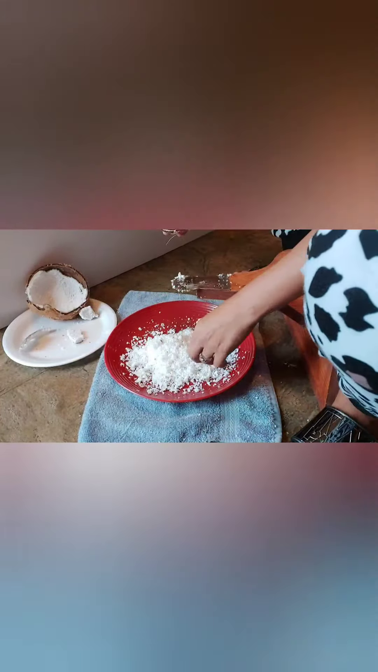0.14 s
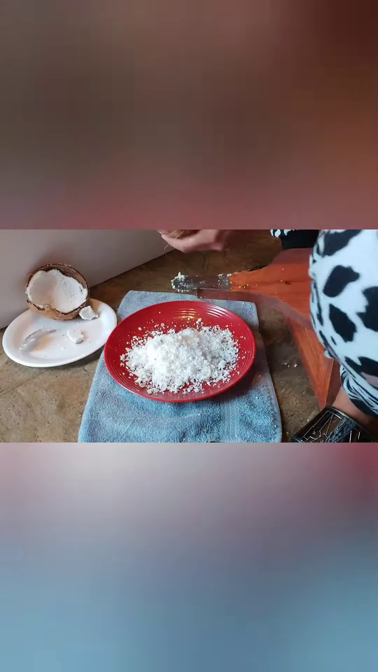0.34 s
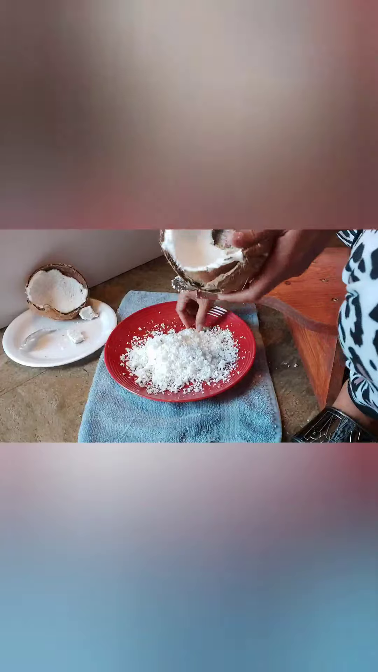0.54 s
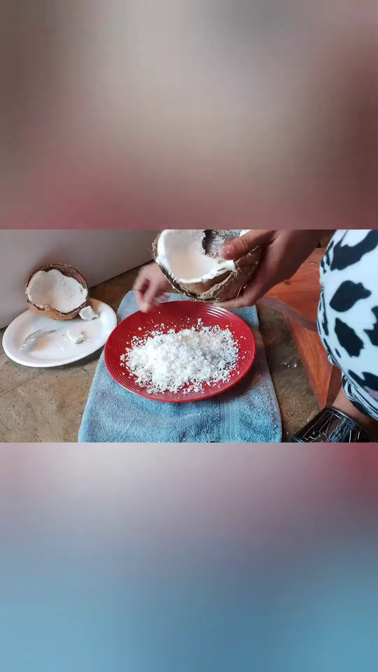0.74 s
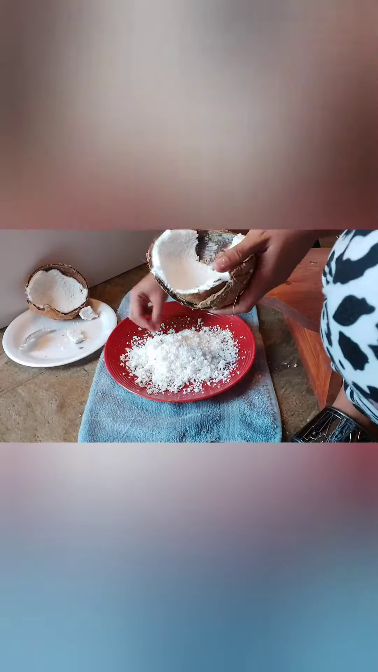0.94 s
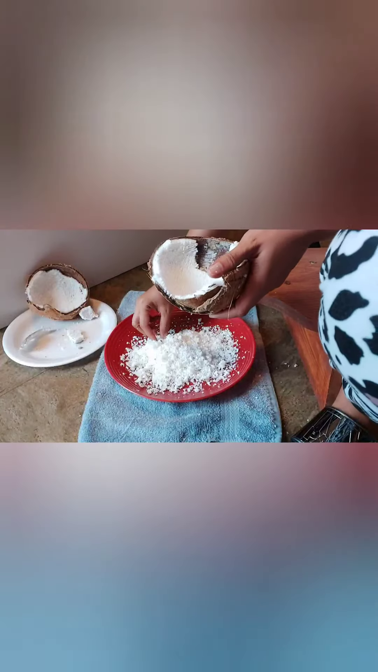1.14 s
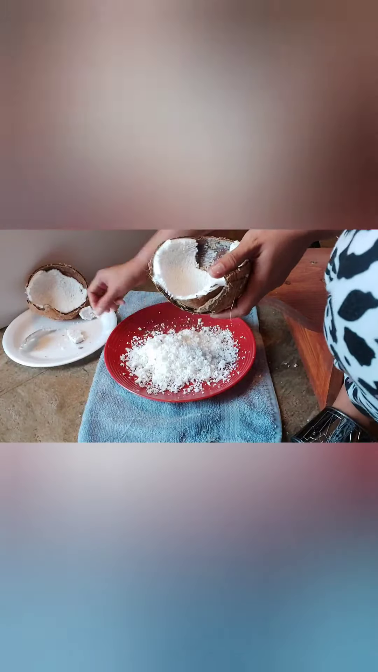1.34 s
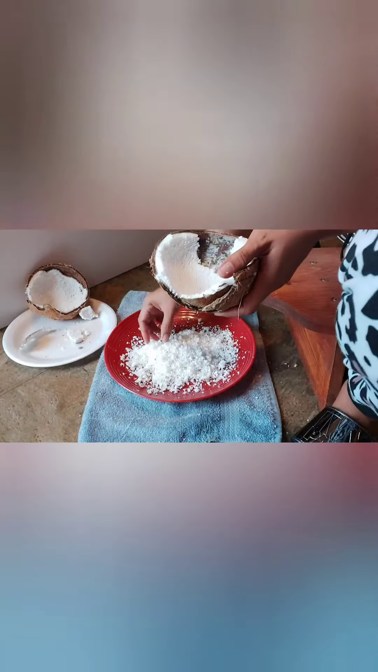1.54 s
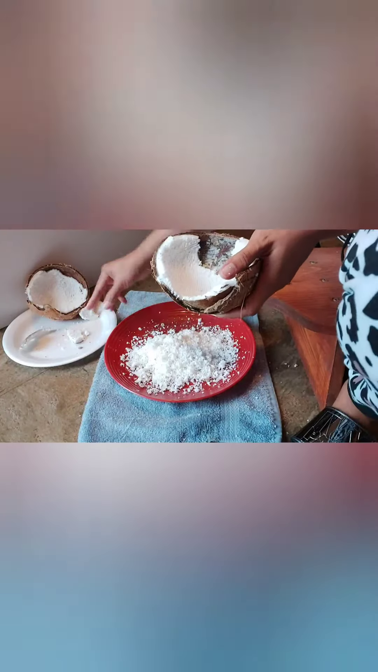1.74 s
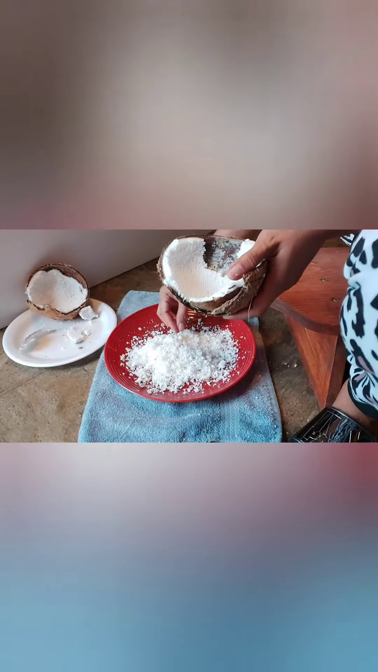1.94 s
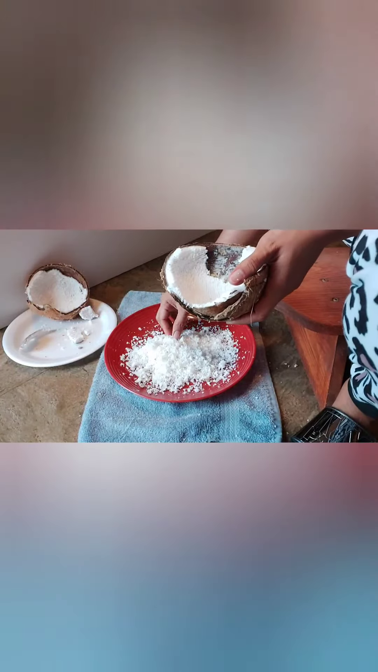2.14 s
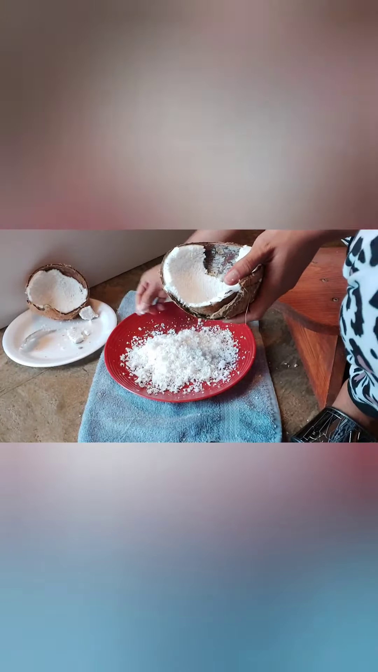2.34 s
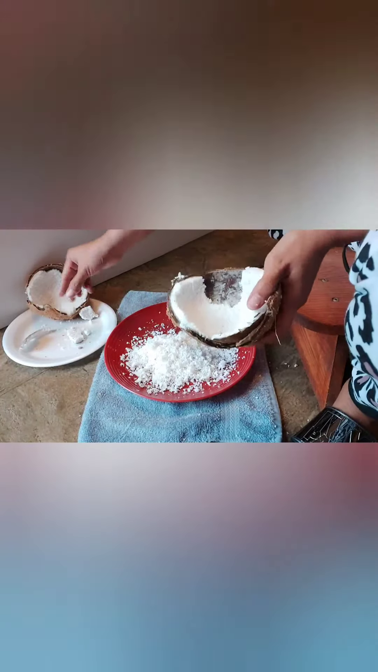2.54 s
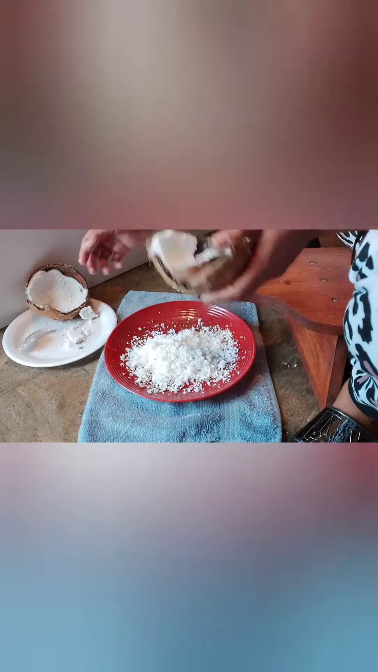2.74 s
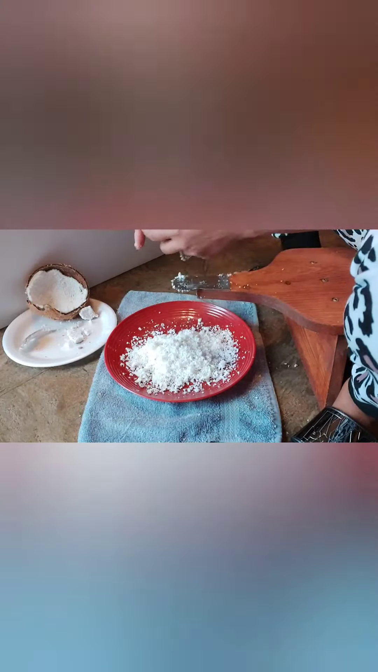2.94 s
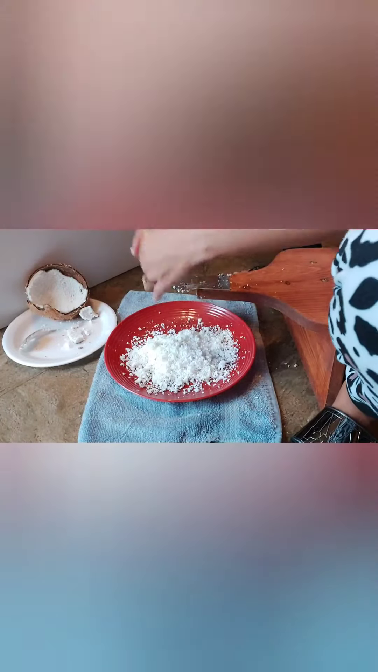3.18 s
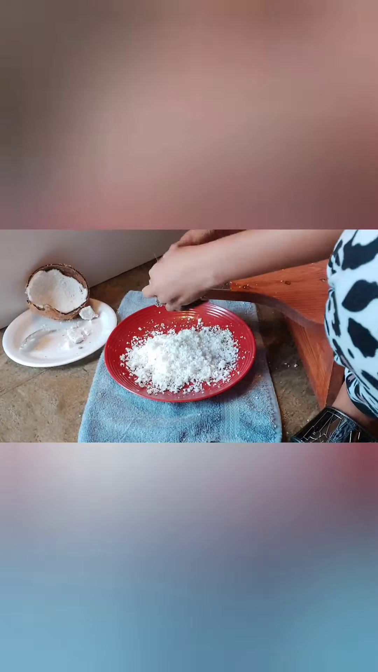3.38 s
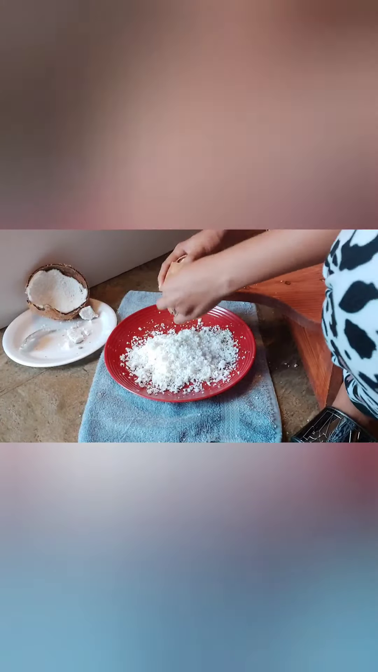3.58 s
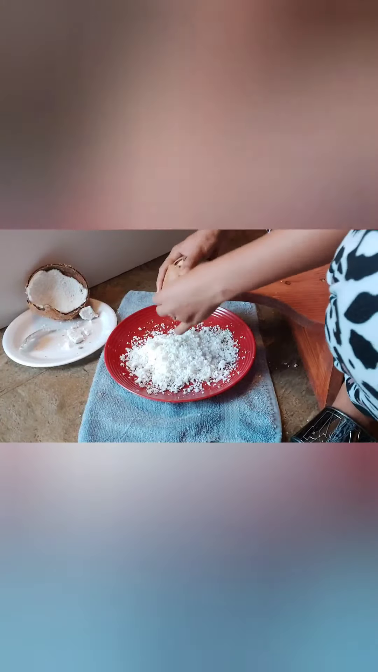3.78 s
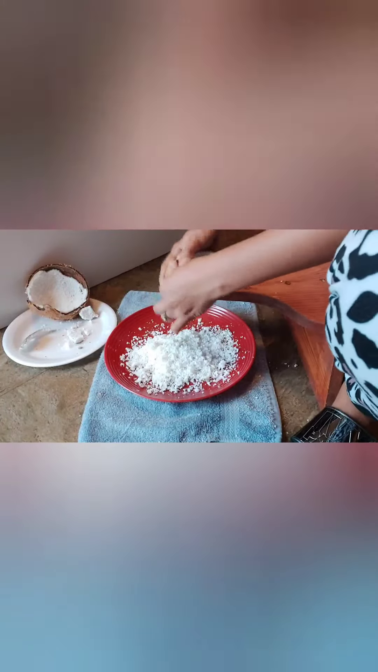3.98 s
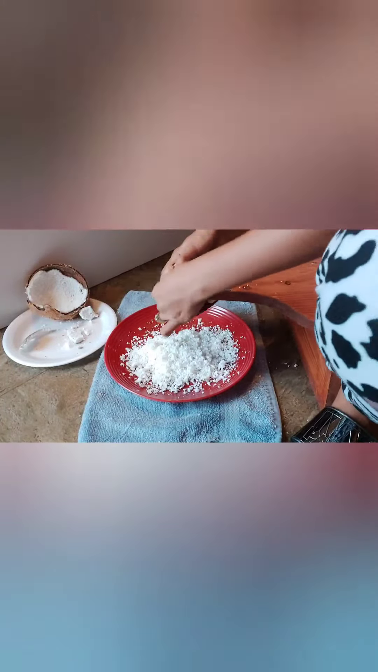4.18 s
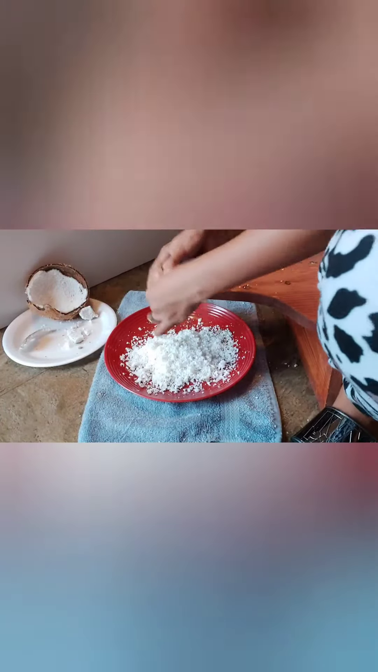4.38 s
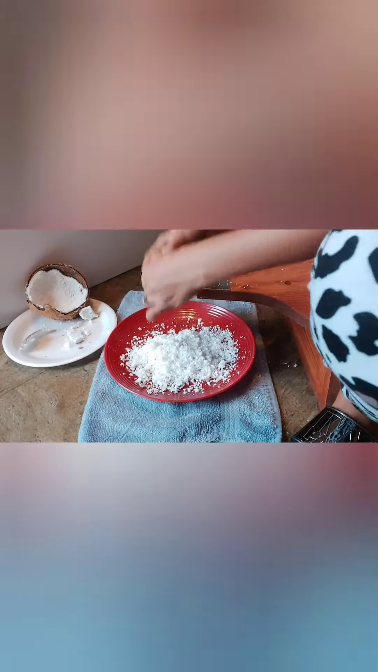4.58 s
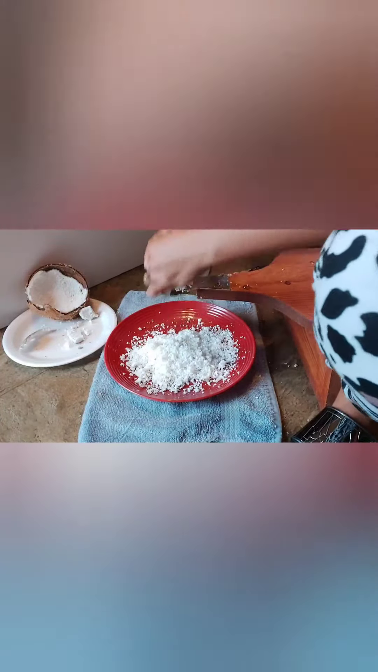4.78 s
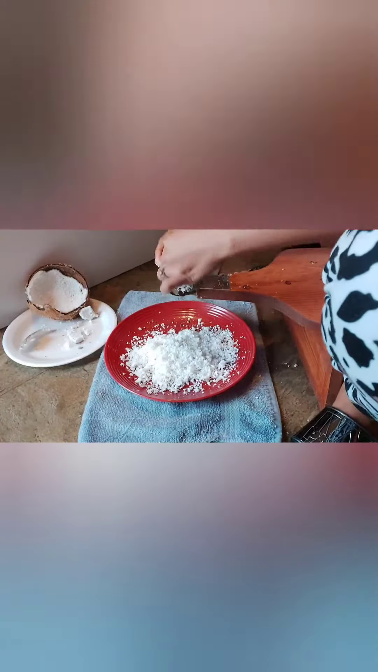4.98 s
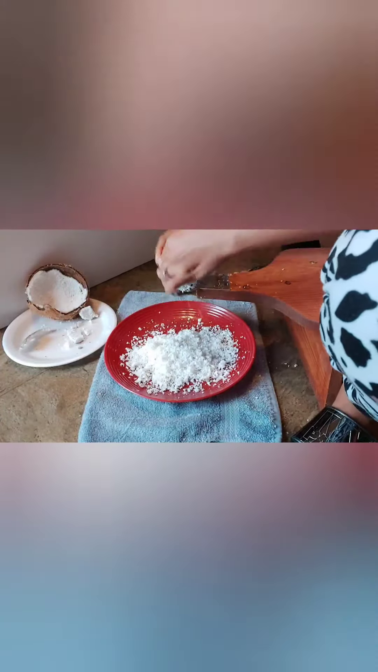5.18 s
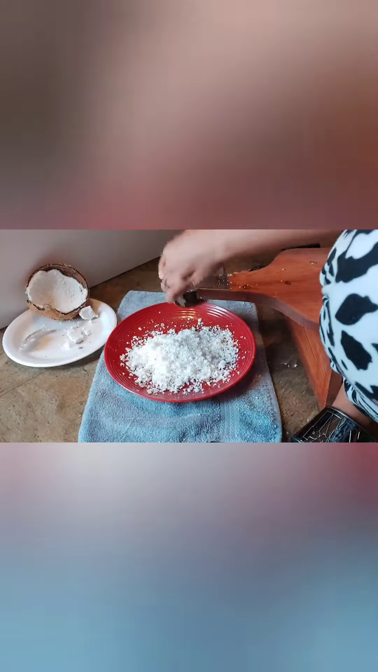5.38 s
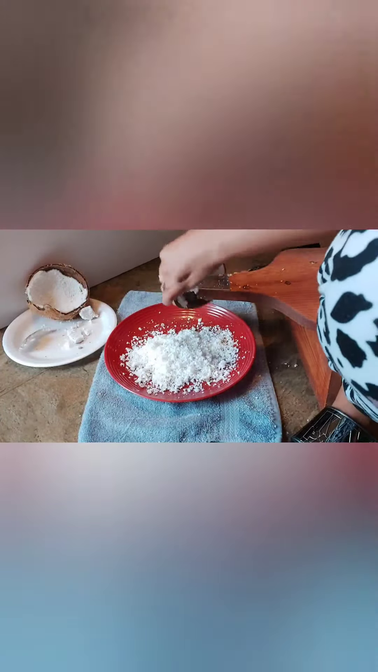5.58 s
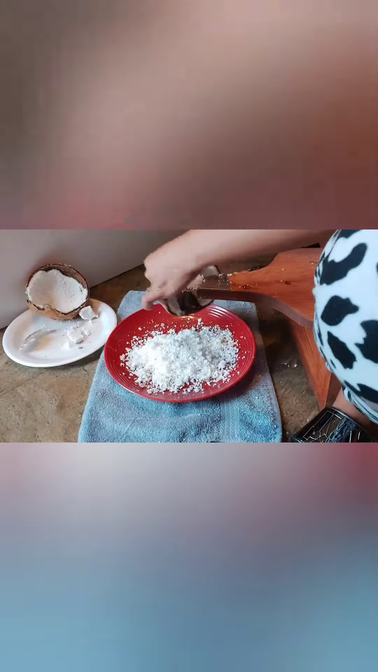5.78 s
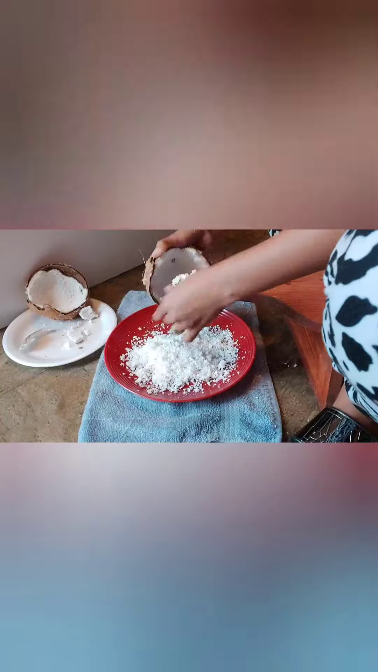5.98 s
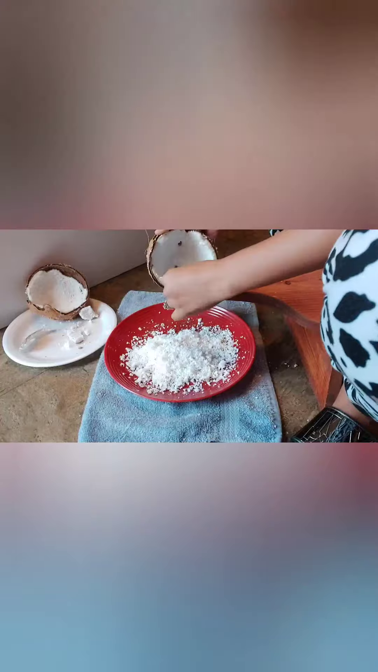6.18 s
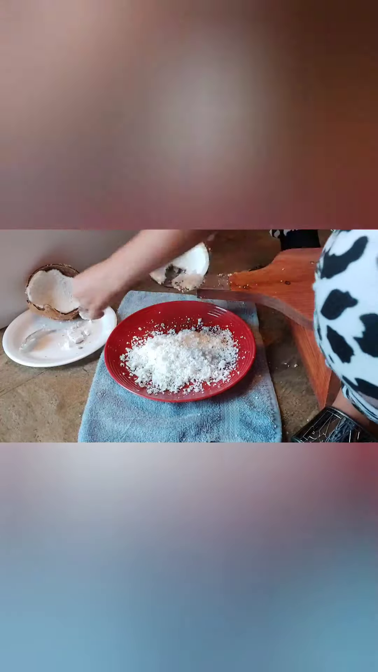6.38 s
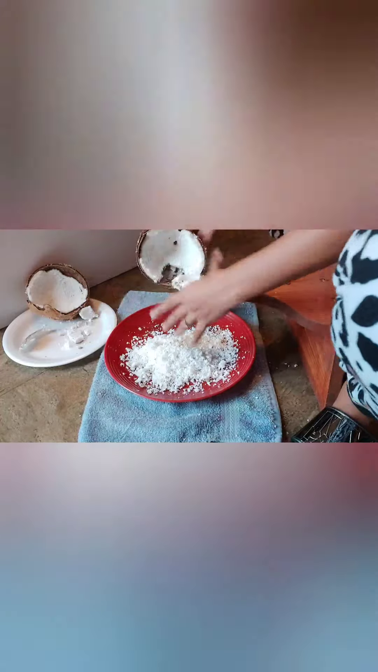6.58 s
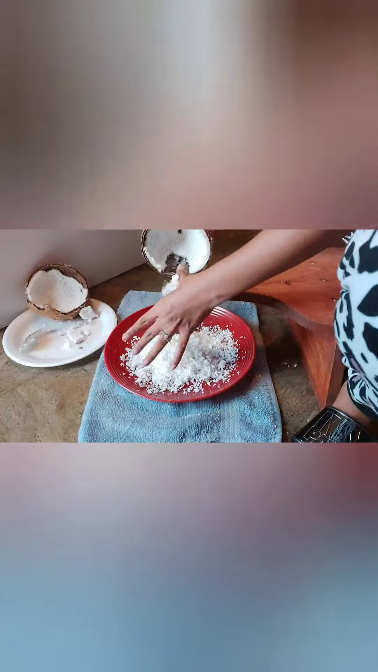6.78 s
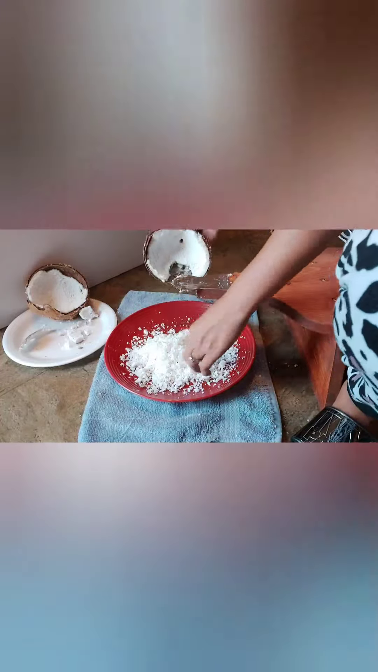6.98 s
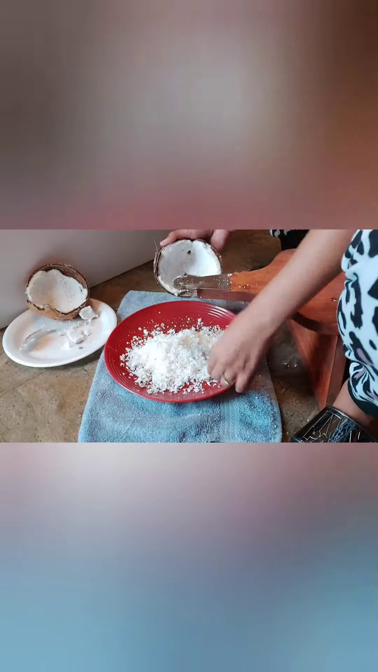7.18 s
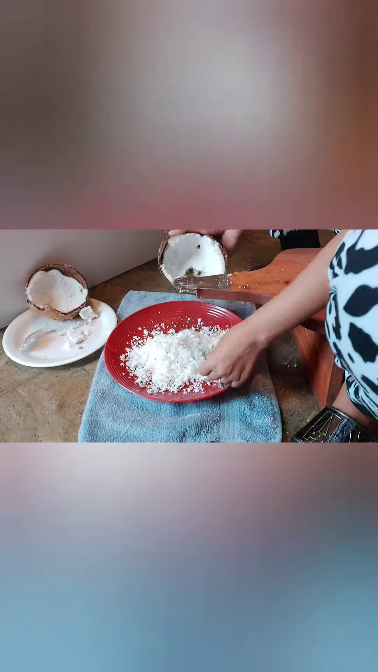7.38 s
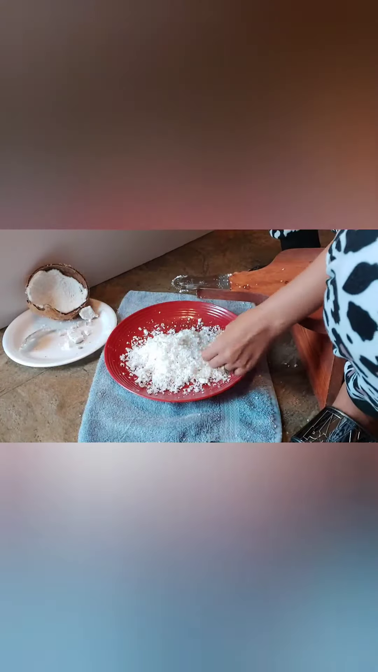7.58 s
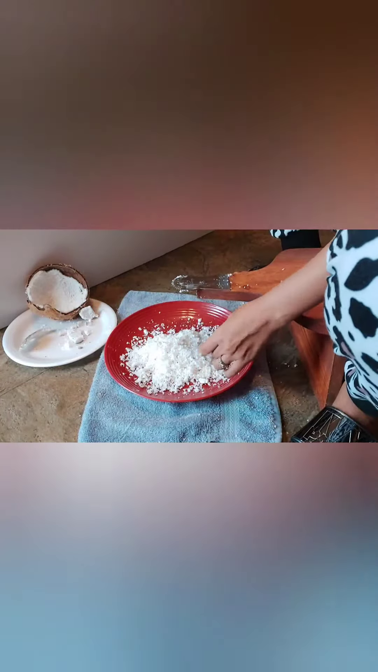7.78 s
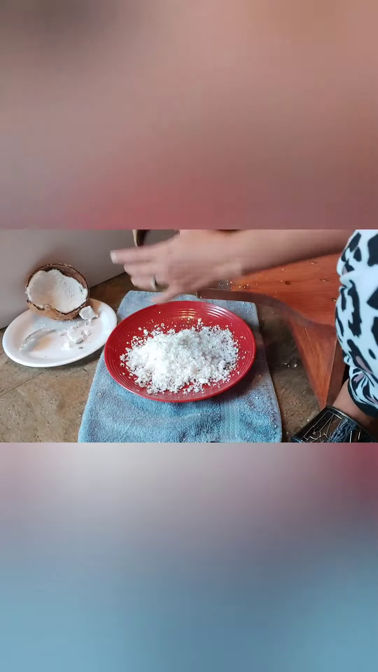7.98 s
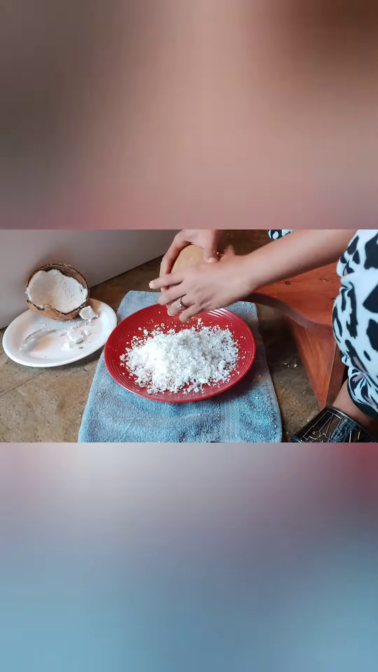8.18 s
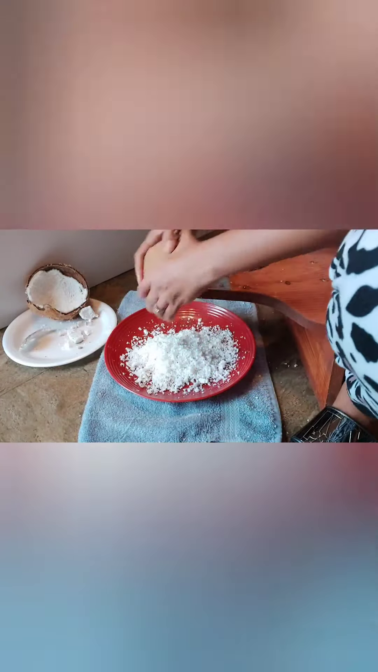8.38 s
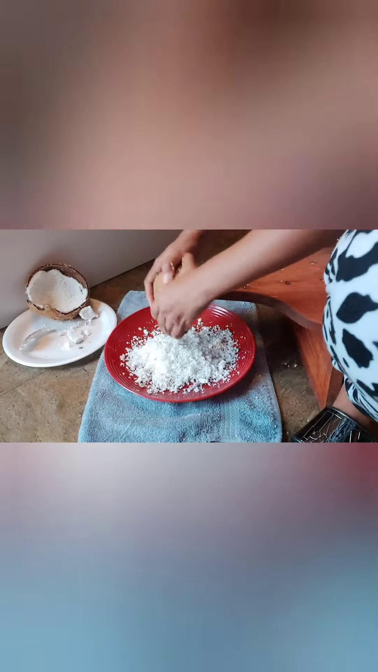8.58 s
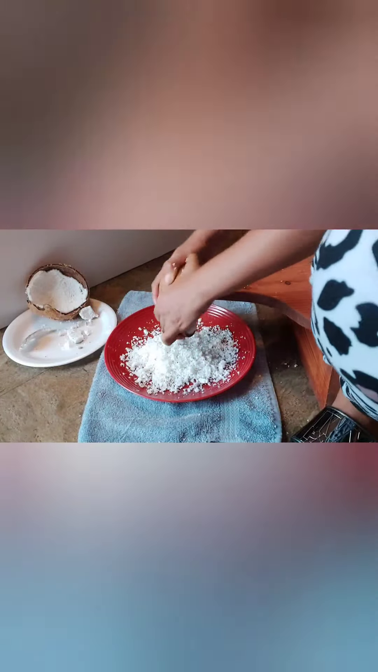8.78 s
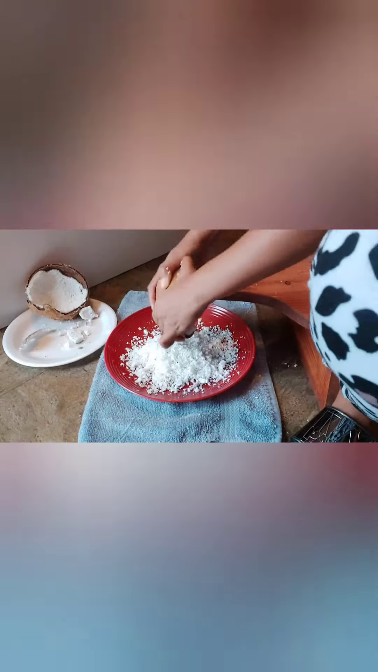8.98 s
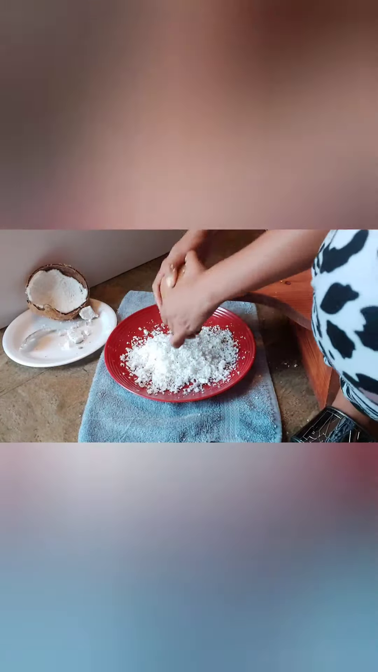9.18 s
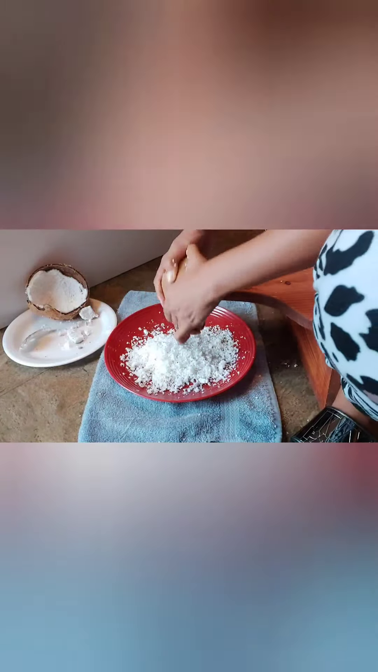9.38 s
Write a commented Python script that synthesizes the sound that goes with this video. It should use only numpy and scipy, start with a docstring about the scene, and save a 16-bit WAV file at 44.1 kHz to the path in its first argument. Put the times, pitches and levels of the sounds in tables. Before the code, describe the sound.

Half a coconut scrapes over a toothed metal blade in two runs of quick rhythmic rasps, wooden bench juddering, after soft rustling and a low machine hum.

```python
"""A machine hums under a rush of air in a small room, and hands rustle in coconut flakes and touch the shell.
Then half a coconut is grated on the toothed blade of a wooden bench, in two runs of quick strokes.
Each stroke is trains of random snaps: torn wet fibres fizz, the blade rasps and the bench judders low.
Hum is wavering tones, air and hiss are coloured noise, touches are ringing noise, thuds are short sines.
Knocks strike the bench and crack the blade; sparse random echoes make the room."""
import sys
import numpy as np
from scipy import signal
from scipy.fft import rfft, irfft, next_fast_len
from scipy.io import wavfile
from scipy.ndimage import uniform_filter1d

SR = 44100
rng = np.random.default_rng(int(sys.argv[2]) if len(sys.argv) > 2 else 0)


def inscribe(sig):
    """Save sig as 16-bit PCM at rate SR to the path in sys.argv[1].

    A 1-D sig is mono; a 2-D sig holds one channel per row.
    Samples are clipped to [-1, 1] before scaling.
    """
    pcm = np.round(np.clip(np.atleast_2d(sig).T, -1, 1) * 32767)
    wavfile.write(sys.argv[1], SR, pcm.astype(np.int16))


N = 415863
TAPS = 8192  # size of the filter designs
HZ = np.fft.rfftfreq(TAPS, 1 / SR)
TIME = np.arange(N) / SR


def amp(db):
    """Turns decibels into a gain."""
    return 10 ** (np.asarray(db) / 20)


def evened(x):
    """Scales a signal to an rms of 1."""
    return x / np.sqrt(np.mean(x ** 2) + 1e-20)


def read(points, hz):
    """Reads a table between its points, on a log-frequency axis."""
    f, value = np.transpose(points)
    return np.interp(np.log(hz + 1), np.log(f), value)


def follow(tables, column):
    """Joins curve tables into one dB curve with a value for every sample."""
    rows = np.concatenate(tables)
    rows = rows[np.argsort(rows[:, 0], kind="stable")]
    return np.interp(TIME, rows[:, 0], rows[:, column])


def during(tables):
    """Gives 1 while any of the tables runs, else 0, with soft edges."""
    on = np.any([(TIME > rows[0][0] - .01) & (TIME < rows[-1][0] + .01) for rows in tables], axis=0)
    return uniform_filter1d(on * 1., size=400)


def add(mix, s, sound):
    """Mixes a sound in, starting at s seconds."""
    part = mix[round(s * SR):][:len(sound)]
    part += sound[:len(part)]


def modes(table):
    """Gain of a set of resonances with steep skirts; each is 6 dB down one width from its centre."""
    power = sum(amp(db) ** 2 / (1 + ((HZ - hz) / width) ** 2) ** 2 for hz, width, db in table)
    return np.sqrt(power)


def ring(x, gain):
    """Filters x with the shape of that gain; the ringing only follows its cause and has energy 1."""
    log_gain = np.log(np.maximum(gain / gain.max(), 1e-5))
    circle = np.concatenate([log_gain, log_gain[-2:0:-1]])
    # minimum phase: the energy comes as early as the gain allows
    response = np.fft.ifft(np.exp(np.conj(signal.hilbert(circle)))).real[:TAPS // 2]
    response = response / np.linalg.norm(response)
    return signal.oaconvolve(np.atleast_2d(x), response[None], axes=1)[:, :x.shape[-1]]


PORT_LAG_S, AIR_LAG_S = 0.00021, 0.00029  # delay of the right port, for near sounds and for air


def ports(pair, likeness, lag_s=PORT_LAG_S):
    """Two microphone ports hear partly the same sound, the right one a little later."""
    size = next_fast_len(N + 1000)
    a, b = rfft(pair, size)
    hz = np.fft.rfftfreq(size, 1 / SR)
    same = np.clip(read(likeness, hz), 0, 1)
    right = same * a + np.sqrt(1 - same ** 2) * b
    right = right * np.exp(-2j * np.pi * hz * lag_s)
    return irfft(np.array([a, right]), size)[:, :N]


# how alike near sounds are at the two ports: f/Hz, likeness (held between 0 and 1)
NEAR_LIKENESS = [(30, 2.7), (400, 0.87), (700, 0.66), (2000, 0.5), (4000, 0.35), (12000, -0.08)]


def slips(per_s, spread_db):
    """Tiny slips make a random train of snaps, a few much larger than the rest."""
    size = amp(spread_db * np.minimum(rng.exponential(1, (2, N)), 4))
    happens = rng.random((2, N)) < per_s / SR
    train = size * rng.choice([-1, 1], (2, N)) * happens
    return ports(evened(train), NEAR_LIKENESS)


# tones of the machine: f/Hz, wavering bandwidth/Hz (held to 0.2-50), level/dB before the port gain
HUM_TONES = [(56, 9.3, -59), (136.9, 2.7, -51), (277.4, 11.3, -52), (292.1, 0.73, -49.5), (533, 13, -67.5),
             (688, 8.7, -72.5)]
# colour of the rushing air: f/Hz, relative level/dB
AIR_COLOUR = [(20, -27), (32, -14.5), (62, 0), (100, -3), (200, -6.5), (260, -1.5), (330, -5), (450, -7.5),
              (540, -14.5), (590, -18), (720, -15.5), (1000, -22), (1600, -27), (2100, -37.5), (2900, -42),
              (3300, -58), (6000, -76)]
# how alike the air is at the two ports: f/Hz, likeness (0 to 1)
AIR_LIKENESS = [(30, 1), (300, 0.58), (700, 0.78), (2000, 0.068), (5000, .1)]
# colour of the microphone hiss: f/Hz, relative level/dB
HISS_COLOUR = [(2000, -57), (3300, 1), (7500, -2.5), (9000, 3), (12500, 2.5), (14500, 0), (15800, -16)]


def background():
    """A machine's tones waver in loudness and phase, in a rush of air over faint microphone hiss."""
    hum = np.zeros(N)
    knots = np.arange(0, TIME[-1] + 1, 1 / 200)  # the slow drift has 200 points per second
    for hz, width, db in HUM_TONES:
        smooth = signal.butter(1, np.clip(width, .2, 50), fs=200, output="sos")
        # the first half lets the filter settle and is dropped
        drift = signal.sosfilt(smooth, rng.standard_normal((2, 2 * len(knots))))[:, len(knots):]
        swell, sway = (np.interp(TIME, knots, d) for d in evened(drift))
        tone = (1 + 0.23 * swell) * np.cos(2 * np.pi * hz * TIME + 0.69 * sway)
        hum += amp(db) * evened(tone)
    air_noise = ports(rng.standard_normal((2, N)), AIR_LIKENESS, AIR_LAG_S)
    air = ring(air_noise, amp(read(AIR_COLOUR, HZ)))
    hiss = ring(rng.standard_normal((2, N)), amp(read(HISS_COLOUR, HZ)))
    port_gain = amp([[.6], [-.6]])  # left and right, in dB
    return (hum + amp(-49.0) * air) * port_gain + amp(-77.0) * hiss


# hands in the flakes and on the husk, one curve per spell: t/s, level/dB before a small trim
RUSTLES = [
    [(0.05, -95), (0.202, -71.5), (0.47, -69), (0.6, -85)],
    [(2.7, -82), (2.908, -67), (3.014, -80), (3.092, -68.5), (3.5, -77.5)],
    [(7.2, -75.5), (7.734, -80.5), (7.756, -68), (7.84, -87), (7.946, -68.5), (8.18, -72)],
]
# colour of the rustling flakes: f/Hz, relative level/dB
FLAKE_COLOUR = [(1000, -36), (3500, -8.5), (7000, -7.5), (10000, -3), (13000, -5), (15800, -10)]
# light touches of fingers, shell and blade:
# t/s, level/dB, f/Hz, width/Hz, rub time scale/s, treble against the main resonance/dB
TOUCHES = [(0.887, -59, 3260, 1900, 0.014, -18), (1.393, -68, 4500, 2500, .0089, 5),
           (1.749, -49.5, 1340, 450, 0.0042, -28), (1.77, -60, 1500, 700, .0071, -17),
           (2.588, -55.5, 8000, 1400, .0026, -10), (3.234, -63, 2220, 600, .016, -18),
           (3.301, -57.5, 2110, 700, .01, -22), (6.062, -63, 1950, 350, 0.021, -20),
           (6.436, -51.5, 2120, 1100, .011, -11.5), (6.512, -48.5, 1980, 330, 0.015, -26)]


def handling():
    """Loose flakes rustle; each touch is a sharp tick in a short rub, with one resonance and some treble."""
    out, lead = np.zeros((2, N)), SR // 20
    t = np.arange(-lead, SR // 6) / SR
    for s, db, hz, width, length, treble_db in TOUCHES:
        # swells before the touch and fades more slowly after it
        rub = np.exp(np.minimum(t / (0.65 * length), -t / (1.43 * length)))
        tick = amp(-8.0) * np.exp(-abs(t) / 0.00057)
        colour = modes([(hz, width, 0), (6500, 5000, treble_db)])
        noise = rng.standard_normal((2, len(t))) * (rub + tick)
        for side, sound in zip(out, ring(noise, colour)):
            add(side, s - lead / SR, amp(db) * sound)
    rustle_level = during(RUSTLES) * amp(follow(RUSTLES, 1) - 1.1)
    rustle = ring(slips(900, 0.84) * rustle_level, amp(read(FLAKE_COLOUR, HZ)))
    return ports(out, NEAR_LIKENESS) + rustle


# weight shifts on the bench: t/s, level/dB before the boost, f/Hz
THUDS = [(3.224, -45, 87.5), (3.287, -42.5, 76.4), (6.584, -42, 132)]


def thuds():
    """Shifting weight bumps the bench: a low sine swells and dies away softly."""
    out, t = np.zeros(N), np.arange(SR // 4) / SR
    u = t / 0.0059  # 1 at the peak of the swell
    for s, db, hz in THUDS:
        bump = u * np.exp(1 - u) * np.sin(2 * np.pi * hz * t)
        add(out, s, amp(db + 10.5) * bump)
    return out


BITE_S, RELEASE_S = 0.0061, 0.01  # the teeth bite in quickly and let go more slowly


def gate(t, start, end):
    """Near 1 while the teeth are in the flesh, with a quick bite and a slower release."""
    bite = (1 + np.tanh((t - start) / BITE_S)) / 2
    release = (1 - np.tanh((t - end) / RELEASE_S)) / 2
    return bite * release


EASE_AT, EASE_WIDTH = 0.45, 0.19  # where and for how long the wrist eases, as shares of the stroke
RUN_UP_DB = -7.5  # sliding before the teeth sink in, against the full force
SLIDE_DB, SLIDE_S = -23, 0.031  # the flesh brushes the teeth around each stroke
SETTLE_DB = -3.5  # the bench shakes less, for the same force, as the stroke goes on
LINGER_DB, LINGER_S = -17.5, .04  # and keeps trembling faintly after it
# one row per stroke of the shell over the teeth: t/s, length/s, force level/dB,
# change of force from start to end/dB, easing midway/dB (below 0 presses harder),
# bench boom over force/dB, bench clatter over force/dB, light run-up/s
STROKES = [(3.548, 0.079, -42.5, -14, 6, 16, 13, 0.016), (3.707, 0.028, -47, 2, 0, 18, 13, 0.018),
           (3.762, 0.084, -41.5, 2.5, 1.5, 7, 8.5, 0.0088), (3.947, 0.091, -40, -8.5, -0.5, 14, 12.5, 0),
           (4.115, 0.082, -38, -5, 9, 9, 13, 0.02), (4.289, 0.073, -37, -4.5, 14.5, 13.5, 11, 0.01),
           (4.454, 0.085, -37, -11.5, 16.5, 15, 14.5, 0.0082), (4.64, 0.073, -39, -6.5, 2, 11, 11, 0),
           (4.801, 0.081, -38.5, 2, 3, 12.5, 12, 0), (4.988, 0.069, -35, -5, 8, 1, 11, 0.0091),
           (5.16, 0.08, -39.5, -2.5, -3.5, 8.5, 10.5, 0.0087), (5.338, 0.07, -34.5, 2.5, 9.5, 7.5, 12.5, 0),
           (5.527, 0.084, -41, -6, -4.5, 13, 13.5, 0.0074), (5.717, 0.012, -28, -5, 0.5, 17, 15, 0.0051),
           (5.873, 0.021, -34, 0, 0, 8.5, 13, 0), (8.25, 0.058, -36, 7, -1.5, 10.5, 13, 0.038),
           (8.406, 0.021, -53, -4, -1, 17, 19, 0.011), (8.487, 0.069, -36, 3, -3.5, 13, 12, 0.027),
           (8.717, 0.063, -39, 0.5, -4, 13, 13.5, 0.057), (8.922, 0.076, -42, -3.5, -4.5, 13.5, 15, 0.029),
           (9.078, 0.021, -49, -5, 0.5, 25.5, 14.5, 0), (9.161, 0.052, -36.5, -0.5, 3.5, 12, 13, 0.046),
           (9.33, 0.096, -38, 2.5, 11.5, 13.5, 11, 0.029)]


def forces():
    """Force on blade and bench: each stroke runs up, bites, eases or presses as the wrist turns, lets go."""
    blade, boom, clatter = np.zeros((3, N))  # powers, so that overlapping strokes add up
    lead = SR // 5
    t = np.arange(-lead, SR // 3) / SR
    for s, length, force_db, change_db, ease_db, boom_db, clatter_db, run_up in STROKES:
        along = np.clip(t / length, 0, 1)
        easing = ease_db * np.exp(-((along - EASE_AT) / EASE_WIDTH) ** 2)
        press = amp(force_db + change_db * (along - .5) - easing)
        outside = np.maximum(abs(t - length / 2) - length / 2, 0)  # seconds away from the stroke
        slide = amp(SLIDE_DB) * np.exp(-outside / SLIDE_S)
        run = amp(RUN_UP_DB) * gate(t, -run_up, 0)
        contact = gate(t, 0, length) ** 2 + run ** 2 + slide ** 2
        linger = amp(LINGER_DB) * (t > length) * np.exp(-abs(t - length) / LINGER_S)
        shake = (press * amp(SETTLE_DB * (along - .5))) ** 2 * (contact + linger ** 2)
        start = s - lead / SR
        add(blade, start, press ** 2 * contact)
        add(boom, start, shake * amp(boom_db) ** 2)
        add(clatter, start, shake * amp(clatter_db) ** 2)
    return np.sqrt([blade, boom, clatter])


def wander(x, patchy_db):
    """The contact point travels round the shell, so patches of pitch come and go."""
    z = signal.stft(x, nperseg=512, noverlap=384)[2]
    patches = uniform_filter1d(rng.standard_normal(z.shape[1:]), size=3, axis=0)  # across pitch
    patches = uniform_filter1d(patches, size=12, axis=1)  # across time
    y = signal.istft(z * amp(patchy_db * evened(patches)), nperseg=512, noverlap=384)[1][:, :N]
    return evened(y) * x.std()


BOOM_HZ = 200  # the bench booms below this pitch and clatters above it
# resonances of bench and shell: f/Hz, width/Hz, relative level/dB
BENCH_MODES = [(75.5, 20.5, -7.5), (159.4, 23.5, 1.5), (208, 61, -6), (275, 57, -10), (330, 53, -9),
               (410, 56, -7), (474, 49, -8), (635, 78, -19.5), (735.6, 54, -14.5)]


def bench(boom, clatter):
    """The wooden bench rings: a heavy push makes it boom, a hard one makes it clatter."""
    size = next_fast_len(N)
    low = 1 / (1 + (np.fft.rfftfreq(size, 1 / SR) / BOOM_HZ) ** 6)
    push = irfft(low * rfft(boom, size) + (1 - low) * rfft(clatter, size), size)[..., :N]
    return ring(push, modes(BENCH_MODES))


# resonances of the steel blade: f/Hz, width/Hz, relative level/dB
BLADE_MODES = [(1012, 113, -2.5), (1158, 133, -3.5), (1413, 130, -9), (1630, 152, -7.5), (1970, 105, -11),
               (2480, 134, -13), (2764, 58, -11), (3067, 128, -11), (3390, 120, -20.5), (3730, 270, -21),
               (4130, 200, -24)]
# colour of the tearing fibres: f/Hz, relative level/dB
FIZZ_COLOUR = [(1000, -44.5), (2200, 12), (3500, -2), (5200, 2), (6500, -1.5), (8000, -3.5), (8900, 1),
               (10000, -2.5), (11500, 0), (12500, -2.5), (13300, -1), (14300, -5.5), (15000, -14),
               (15800, -5)]
# fibre fizz against the force: t/s, level/dB
FIZZ_SHARE = [(3.9, -14), (4.2, -9), (5.8, -9.5), (8.2, -12.5), (9.4, -11)]


def grating():
    """Teeth plough the flesh: fibres snap, the blade rasps and the bench judders."""
    rasp_force, boom_force, clatter_force = forces()
    fizz_force = rasp_force * amp(follow([FIZZ_SHARE], 1))
    # the shell sticks and slips, which flutters all three layers together
    flutter = uniform_filter1d(rng.standard_normal(N), size=340)
    flutter = evened(uniform_filter1d(flutter, size=220))
    jolts = slips(2500, 1.56) * amp(0.3 + 2.24 * flutter)
    judder = bench(jolts * boom_force, jolts * clatter_force)
    rasp_snaps = slips(4500, 2.5) * rasp_force * amp(0.94 + 1.8 * flutter)
    rasp = ring(rasp_snaps, modes(BLADE_MODES))
    fizz_snaps = slips(6000, 3.4) * fizz_force * amp(2.03 + 0.58 * flutter)
    fizz = ring(fizz_snaps, amp(read(FIZZ_COLOUR, HZ)))
    return judder + wander(rasp, patchy_db=3.0) + wander(fizz, patchy_db=3.0)


BLOW_DB = 19.5  # boost of the blows on the bench
CRACK_S, CRACK_FIZZ_DB = 0.0043, -11  # rise time of the crack, and the gain of its fizz
# the shell lands on the blade or a tooth catches hard:
# t/s, bench boom level/dB and bench clatter level/dB (both before the boost), blade crack level/dB
KNOCKS = [(3.566, -30, -32, -31.5), (3.713, -19.5, -24, -60), (3.957, -13, -16, -49),
          (4.003, -15, -15, -54), (4.096, -26, -35, -48), (4.254, -34, -33, -48), (4.457, -12, -8, -42),
          (4.906, -42, -22.5, -49), (4.952, -16.5, -15.5, -39), (4.996, -7.5, -12.5, -33.5),
          (5.347, -12, -15, -54), (5.721, -20, -14.5, -31.5), (8.042, -25, -22.5, -52.5),
          (8.667, -22, -29, -43.5), (8.741, -12, -17, -42), (8.944, -39, -15, -43), (9.13, -33, -13.5, -37),
          (9.142, -30, -18.5, -41)]


def knocks():
    """A sudden catch gives the bench one blunt blow and the blade a short crack."""
    boom, clatter, crack = np.zeros((3, N))
    blow, t = np.hanning(SR // 900), np.arange(SR // 20) / SR
    blow = blow / blow.sum()
    burst = t / CRACK_S * np.exp(1 - t / CRACK_S)
    for s, boom_db, clatter_db, crack_db in KNOCKS:
        add(boom, s, amp(boom_db + BLOW_DB) * blow)
        add(clatter, s, amp(clatter_db + BLOW_DB) * blow)
        add(crack, s - CRACK_S, amp(crack_db) * burst)  # peaks at s
    snaps = slips(9000, 1.4) * crack
    crack_fizz = amp(CRACK_FIZZ_DB) * ring(snaps, amp(read(FIZZ_COLOUR, HZ)))
    return bench(boom, clatter) + ring(snaps, modes(BLADE_MODES)) + crack_fizz


def room(x):
    """Sparse reflections of a small room; treble lingers longest, and little returns around 400 Hz."""
    taps = rng.choice([-1., 1.], (2, SR // 2)) * (rng.random((2, SR // 2)) < 3000 / SR)
    taps[:, :SR // 250] = 0  # no reflection in the first 4 ms
    hz, t, z = signal.stft(taps, SR, nperseg=256)
    t60 = read([(300, 0.078), (2500, 0.13), (12000, 0.2)], hz)  # seconds to fall by 60 dB
    wet_db = read([(150, -2), (400, -34.0), (1200, -3.5), (12000, -4.5)], hz)
    fade = amp(wet_db[:, None] - 60 * t / t60[:, None])
    tail = signal.istft(z * fade, SR, nperseg=256)[1]
    return signal.fftconvolve(x, tail / np.linalg.norm(tail[0]), axes=1)[:, :N]


# how near sounds lean between the two ports: f/Hz, left minus right level/dB
LEAN = [(100, -1.5), (160, 0), (420, -0.5), (630, -2), (730, 2.5), (1000, -2.5), (1600, -1), (3200, 1.5),
        (4200, 0), (7800, -2.5), (9300, 4), (12000, 3.5), (14500, -0.5)]


def scene():
    """The work at the bench, leaning left or right by pitch, in its room with the machine."""
    near = handling() + thuds() + grating() + knocks()
    lean_db = read(LEAN, np.fft.rfftfreq(N, 1 / SR)) / 2  # half the lean to each side
    near = irfft(rfft(near) * amp([lean_db, -lean_db]), N)
    return background() + near + amp(-9.5) * room(near)


EDGE_HZ = 15700


def record(dry):
    """The recorder's band limit: a steep filter takes away the highest treble."""
    low_pass = signal.firwin(511, EDGE_HZ, window=("kaiser", 9), fs=SR)
    return signal.oaconvolve(dry, low_pass[None], "same")


dry = scene()
out = record(dry)
inscribe(out)
```